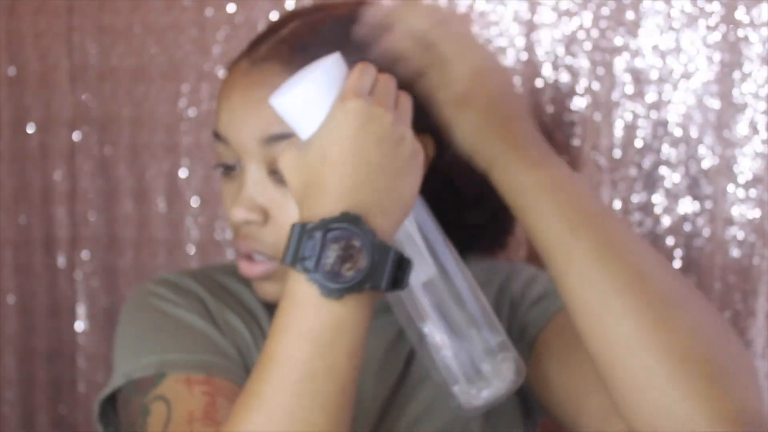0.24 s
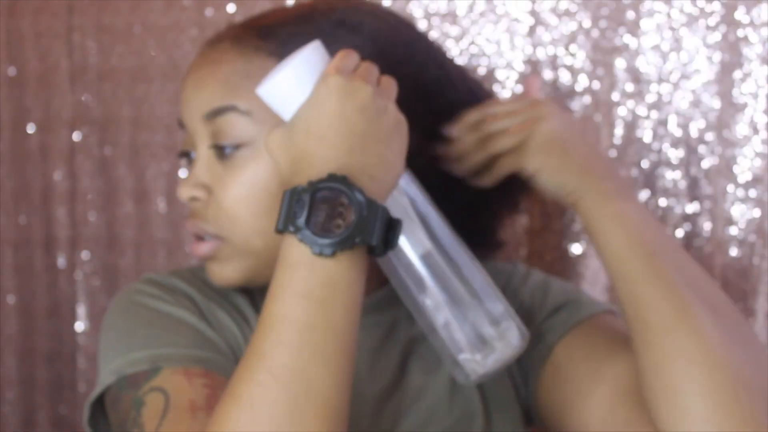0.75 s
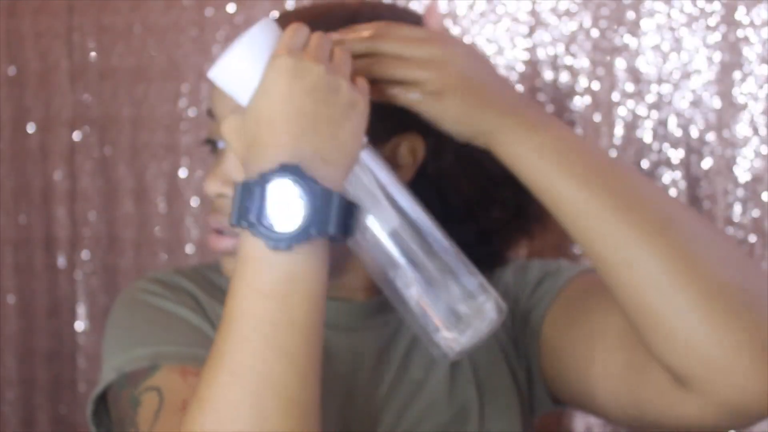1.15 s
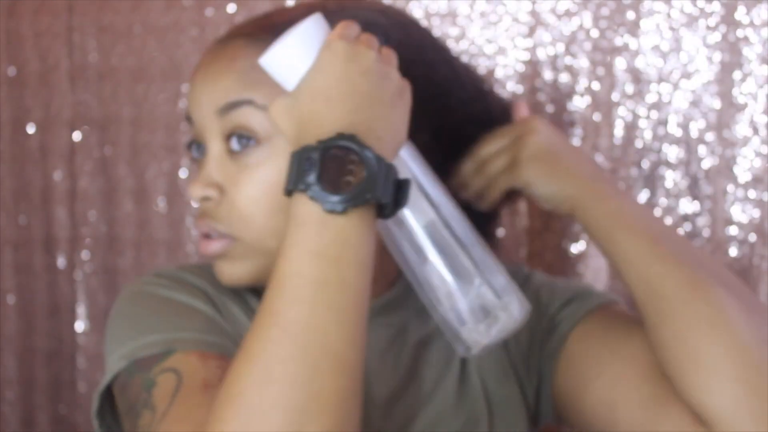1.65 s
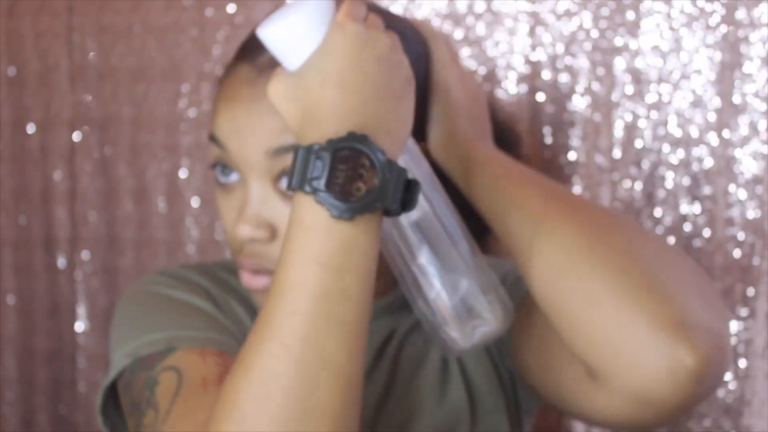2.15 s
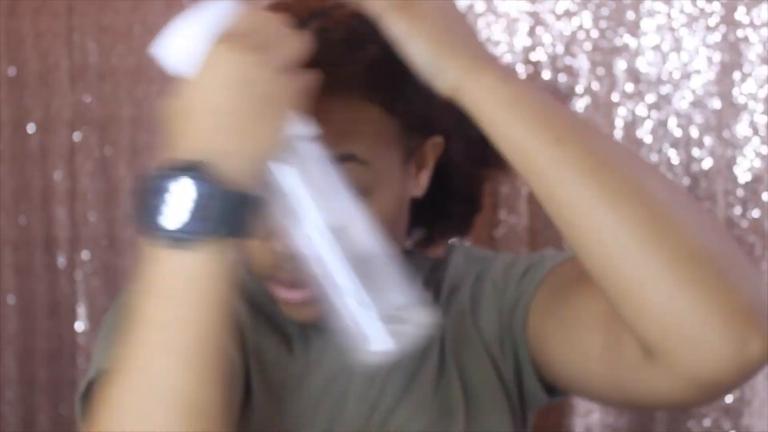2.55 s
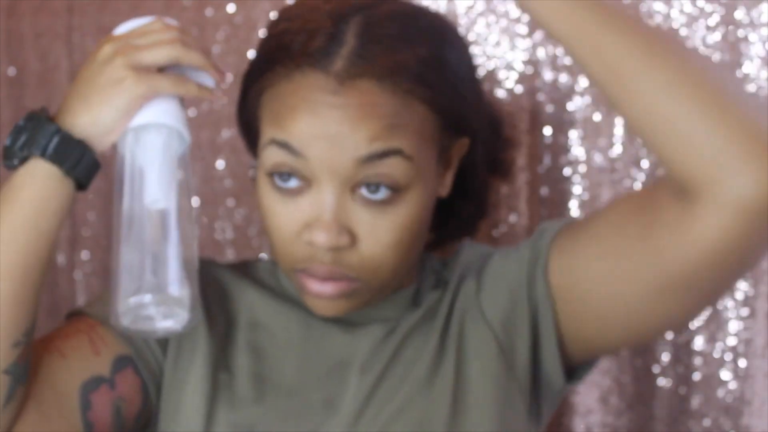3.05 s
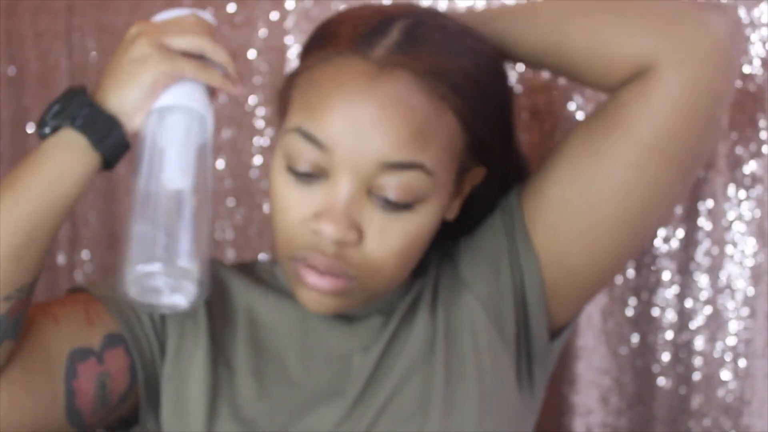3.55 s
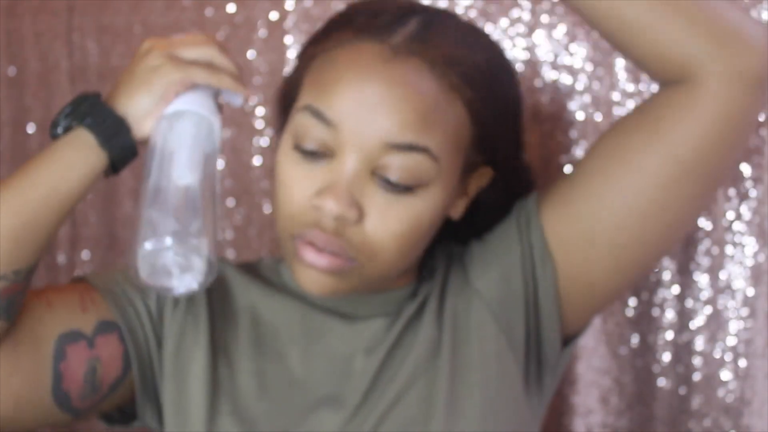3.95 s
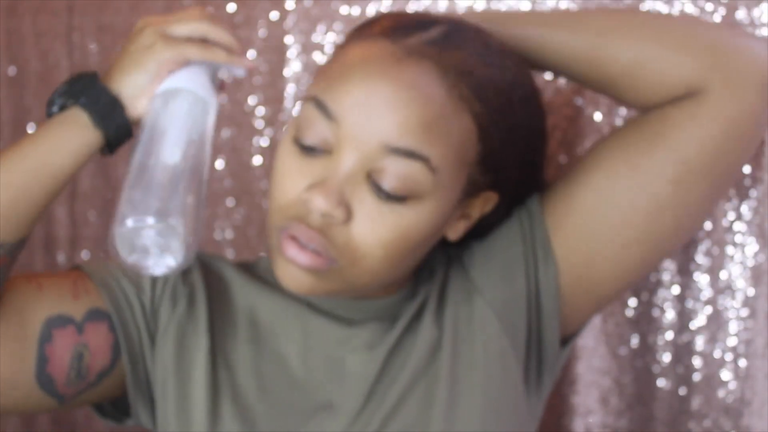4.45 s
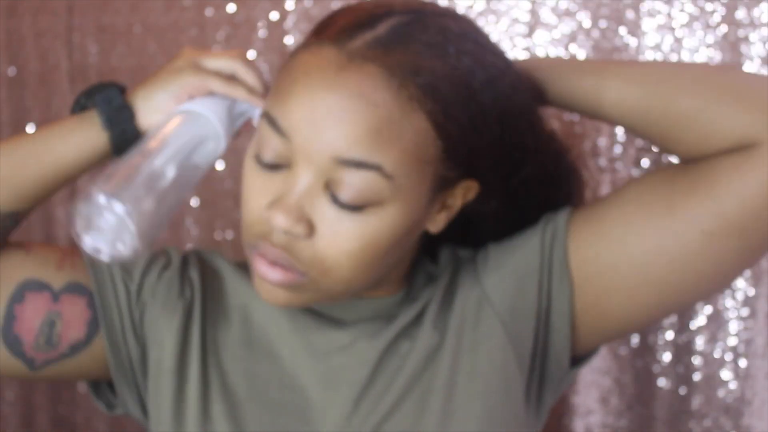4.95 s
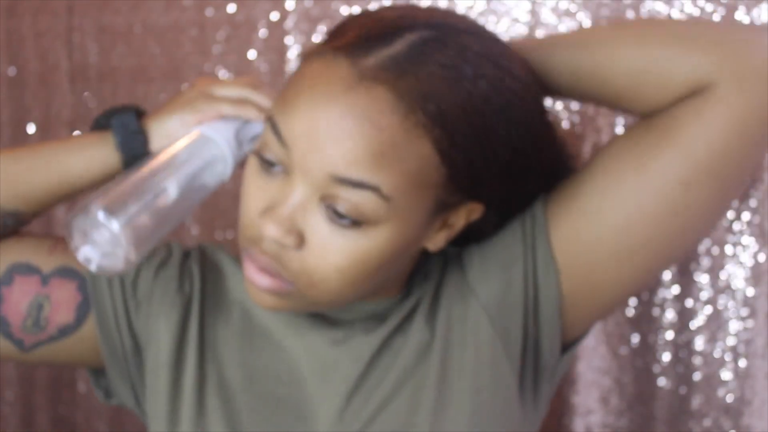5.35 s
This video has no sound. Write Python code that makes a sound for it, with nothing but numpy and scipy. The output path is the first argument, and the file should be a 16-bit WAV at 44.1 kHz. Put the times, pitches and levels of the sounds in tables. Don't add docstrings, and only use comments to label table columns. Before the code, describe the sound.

Close, uneven bursts of hissing water spray with clicking plastic trigger snaps in a small room, above a quiet steady hum.

```python
import sys
import numpy as np
from scipy import signal
from scipy.io import wavfile
from scipy.ndimage import uniform_filter1d

SR = 44100
rng = np.random.default_rng(int(sys.argv[2]) if len(sys.argv) > 2 else 0)


def inscribe(sig):
    pcm = np.round(np.clip(np.atleast_2d(sig).T, -1, 1) * 32767)
    wavfile.write(sys.argv[1], SR, pcm.astype(np.int16))


def elevation(decibels):
    levels = np.asarray(decibels, float)
    return 10 ** (levels / 20)


N = 247401
TIME = np.arange(N) / SR

# (frequency [Hz], level [dB per Hz])
JET_COLOUR = [(240, -61.5), (400, -16), (741, -10.5), (919, -5), (1330, -5.5), (1870, -7), (2390, 0.5),
              (2880, -5.5), (3200, -2), (6210, -3), (8860, -7), (12400, -23), (15900, -39)]


def evened(x):
    return x / np.sqrt(np.mean(x ** 2) + 1e-20)


def read(points, hz):
    f, value = np.transpose(points)
    return np.interp(np.log(hz + 1), np.log(f + 1), value)


def add(mix, s, sound):
    part = mix[round(s * SR):][:len(sound)]
    part += sound[:len(part)]


def resonate(x, hz, width, times):
    turn = np.exp(2j * np.pi * np.cumsum(hz * np.ones(len(x))) / SR)
    r = np.exp(-np.pi * width / SR)
    for _ in range(times):
        x = 2 * (turn * signal.lfilter([1 - r], [1, -r], x / turn + 1e-18)).real
    return x


def ring(modes, detune):
    t = np.arange(4000) / SR
    return sum(elevation(db - 60 * t / t60) * np.sin(2 * np.pi * hz * d * t)
               for (hz, db, t60), d in zip(modes, detune))


def colour(x, spectrum):
    hz = np.fft.rfftfreq(256, 1 / SR)
    log_gain = np.log(elevation(np.maximum(read(spectrum, hz), -100)))
    circle = np.concatenate([log_gain, log_gain[-2:0:-1]])
    causal = np.fft.ifft(np.exp(circle - 1j * signal.hilbert(circle).imag)).real
    return signal.fftconvolve(x, causal[:128])[:len(x)]


def drift(top_hz):
    hz, t = np.geomspace(top_hz / 12, top_hz, 16)[:, None], TIME[::256]
    waves = np.sin(2 * np.pi * (hz * t + rng.random(hz.shape))) / np.sqrt(hz)
    return np.interp(TIME, t, evened(waves.sum(0)))


def noise(spectrum, patchy_db, size, tilt_db=None):
    hop = size // 4
    frames, hz = N // hop + 5, np.fft.rfftfreq(size, 1 / SR)
    a, b, patches = rng.standard_normal((frames, len(hz), 3)).T
    patches = uniform_filter1d(uniform_filter1d(patches, size=5, axis=0), size=10, axis=1)
    slow_patches = uniform_filter1d(patches, size=60, axis=1)
    patches = evened(patches) + 1.5 * evened(slow_patches)
    field = elevation(read(spectrum, hz)[:, None] + patchy_db * patches)
    if tilt_db is not None:
        octaves = np.log2((hz[:, None] + 50) / 4500)
        leaning = field * elevation(octaves * np.interp(np.arange(frames) * hop, np.arange(N), tilt_db))
        field = leaning * np.sqrt((field ** 2).sum(0) / (leaning ** 2).sum(0))
    return evened(signal.istft((a + 1j * b) * field, nperseg=size, noverlap=size - hop)[1][:N])


def valve():
    # (valve opens [s], valve shuts [s], pressure [dB], nozzle tuning [factor],
    # bottle ring [dB])
    bursts = [(-.1, 0.355, -35, 0.94, -1), (0.481, 0.658, -35.5, 0.91, -1),
              (0.823, 1.082, -35.5, 0.96, -0.5), (1.314, 1.722, -35.5, 1.01, -1.5),
              (1.696, 2.226, -35.5, 1.02, -1), (2.265, 2.498, -35.5, 0.92, -1),
              (2.785, 3.056, -34.5, 1, -5.5), (3.564, 3.879, -35, 1.03, -2.5),
              (3.95, 4.181, -35.5, 1.05, -1), (4.526, 4.746, -35.5, 1.08, -0.5),
              (4.869, 5.042, -35.5, 1.07, -1.5), (5.566, 5.8, -37.5, 1.04, -2)]
    opens, shuts, full_db, tuned, rings_db = np.transpose(bursts)[..., None]
    build_s, stick_s = 0.019, 0.16
    rest_s = np.maximum(abs(opens - np.roll(shuts, 1)), .01)
    spurt = 0.57 * (1 - np.exp(-rest_s / stick_s))
    since, after = np.maximum(TIME - opens, 0), np.maximum(TIME - shuts, 0)
    sag_db = 4 * since
    bleed_db = 1.5 * (1 - np.exp(-after / 0.0061)) + 290 * after
    lost_db = sag_db + bleed_db
    flow = (since > 0) * (1 - (1 - spurt) * np.exp(-since / build_s))
    each_db = full_db - lost_db + 20 * np.log10(flow + 1e-9)
    newest, pressure_db = each_db.argmax(0), each_db.max(0)
    bled_db = np.minimum(lost_db[newest, np.arange(N)], 30)
    popping = np.exp(-since[newest, np.arange(N)] / build_s)
    ring_db = rings_db[newest, 0] + 0.063 * bled_db
    tuning = uniform_filter1d(tuned[newest, 0], size=800)
    return pressure_db, bled_db, popping, ring_db, tuning


def mist():
    # (frequency [Hz], width [Hz], level [dB])
    nozzle_rings = [(2225, 430, -5.5), (3092, 300, -2.5), (3550, 69, -7.5), (5320, 920, -2),
                    (6660, 580, -5)]
    # (frequency [Hz], width [Hz], level [dB])
    bottle_air = [(923, 60, -17), (835, 37, -28), (983, 130, -37)]
    # (time [s], lower nozzle ring [dB], upper nozzle ring [dB],
    # lower ring tuning [factor], brightness [dB per octave])
    facing = [(0, 3, -4, 1.13, 1), (.6, 0, -4, 1.04, 1.5), (1, 1.5, -1, 1.05, 1.5),
              (1.4, 4.5, 2.5, 1.07, 1.5), (1.8, 6.5, 0, 1.07, 2), (2.3, 0.5, -2.5, 1.17, 1.5),
              (2.9, -4, 0.5, 0.96, 2.5), (3.65, 3.5, 1.5, 0.94, 2), (3.85, -3, 4, 0.99, 1.5),
              (4.1, 0, 2.5, 0.98, 2.5), (4.65, 1.5, 0.5, .94, 2.5), (4.95, 2, 0, 1.03, 2.5),
              (5.6, -5, 6, 1, 2)]
    turn, lower_db, upper_db, lower_tuning, facing_db = np.transpose(facing)
    pressure_db, bled_db, popping, ring_db, tuning = valve()
    tilt_db = np.interp(TIME, turn, facing_db) - .12 * bled_db + 0.5 * popping
    droplets = evened(uniform_filter1d(rng.standard_normal(N), size=60))
    sputter = elevation(0.71 * droplets)
    jet = noise(JET_COLOUR, patchy_db=0.5, size=512, tilt_db=tilt_db) * sputter
    white = rng.standard_normal(N) * sputter
    tunings = [np.interp(TIME, turn, lower_tuning)] + [tuning] * (len(nozzle_rings) - 1)
    lower, *upper = (elevation(db) * evened(resonate(white, hz * k, width, times=2))
                     for (hz, width, db), k in zip(nozzle_rings, tunings))
    nozzle = elevation(np.interp(TIME, turn, lower_db)) * lower
    nozzle = nozzle + elevation(np.interp(TIME, turn, upper_db)) * sum(upper[:2]) + sum(upper[2:])
    bottle = sum(elevation(db) * evened(resonate(white, hz, width, times=2)) for hz, width, db in bottle_air)
    return elevation(pressure_db) * (evened(jet + elevation(-8.0) * nozzle) + elevation(ring_db) * bottle)


def trigger():
    # (time [s], peak [dB], hollow knock [dB], middle [dB], rattle length [s])
    snaps = [(.431, -26, -17, -16, 0.009), (0.791, -32, -7.5, -4, 0.015), (1.2516, -32, -7, -5.5, 0.024),
             (1.7084, -25, -12.5, -24, 0.0067), (2.208, -32, -8.5, -10, 0.0083),
             (2.728, -26, -11, -13, 0.0072), (3.483, -29, -16, -10, 0.0083),
             (3.921, -23.5, -20, -9, 0.0084), (4.444, -29.5, -25, -8, 0.0062),
             (4.8297, -25, -15.5, -10, 0.0079), (5.4936, -26.5, -18, -3.5, 0.0076)]
    # (frequency [Hz], level [dB])
    lever_colour = [(300, -67), (600, -55), (1100, -15), (1420, 6.5), (1750, -10), (2300, 11), (2750, -8.5),
                    (3200, 8), (4000, 4), (4600, 7.5), (6000, -52)]
    # (frequency [Hz], level [dB])
    scrape_colour = [(3500, -48), (4600, -6), (5700, 2), (6700, 4), (7600, -2.5), (8600, -3), (9800, -14),
                     (12200, -33.5), (13500, -55), (16000, -60)]
    # (frequency [Hz], level [dB])
    tick_colour = [(2000, -20), (5000, -8), (9000, -2), (11500, 6), (13000, 0), (14200, -18), (16500, -14)]
    # (frequency [Hz], level [dB], t60 [s])
    pump_parts = [(2340, -10, 0.01), (3130, -4.5, 0.011), (4180, -3.5, 0.0085), (5650, -8, 0.005),
                  (7100, 1.5, 0.0086), (8700, 0, 0.0088), (11900, -15, .004)]
    # (frequency [Hz], level [dB], t60 [s])
    wall = [(483, -8.5, 0.073), (533, -6, 0.075), (700, 4.5, 0.015)]
    # (frequency [Hz], level [dB], t60 [s])
    hollow_air = [(726, 3.5, 0.043), (829, 12, 0.051), (927, 8.5, 0.053)]
    out, hollow, t = np.zeros(N), np.zeros(N), np.arange(4000) / SR
    rise = 1 - np.exp(-t / .00015)
    puff = elevation(-24.0 - 140 * t) / (1 + np.exp((t - .042) / 0.0016))
    first = 0.75 * np.exp(-t / 0.0014)
    blow = signal.windows.hann(30)
    swell = (1 - np.exp(-t / .008)) ** 1.5
    for s, peak_db, knock_db, middle_db, length in snaps:
        rough, airy, gritty = rng.standard_normal((3, 4000))
        contacts = abs(gritty) > 1.9
        fade = rise * np.exp(-(t / (0.98 * length)) ** 1.4)
        scrape = (0.65 + contacts + first) * fade + 0.3 * puff
        detune = 1 + .02 * rng.standard_normal(13)
        struck = [(hz, db + 2.0 * luck, t60)
                  for (hz, db, t60), luck in zip(pump_parts, rng.standard_normal(7))]
        taps = uniform_filter1d(rough * contacts * fade, size=3)
        parts = [
            colour(rough * scrape, scrape_colour),
            colour(airy * scrape, lever_colour),
            signal.fftconvolve(taps, ring(struck, detune[6:]))[:4000],
            swell * signal.fftconvolve(blow, ring(wall, detune[:3]))[:4000],
            swell * signal.fftconvolve(blow, ring(hollow_air, detune[3:6]))[:4000],
            colour(airy * (puff + 0.088 * first * rise), JET_COLOUR),
            colour(gritty * rise * np.exp(-t / .002), tick_colour)]
        parts = [p / np.sqrt(uniform_filter1d(p ** 2, size=200).max()) for p in parts]
        bright, middle, clack, thud, knock, sucked, tick = parts
        tick_db = -20 + .8 * (peak_db + 24)
        snap = bright + elevation(middle_db) * middle + elevation(-6) * clack + elevation(-13) * sucked + elevation(tick_db) * tick
        add(out, s, elevation(peak_db) * snap)
        add(hollow, s, elevation(-47.5) * thud + elevation(peak_db + knock_db) * knock)
    return out, hollow


def creaks():
    # (time [s], level [dB], frequency [Hz], width [Hz], length [s])
    slips = [
        (3.4105, -44, 3350, 550, 0.019),
        (3.434, -45, 3350, 550, 0.024),
        (3.4115, -48, 5300, 2500, 0.004),
        (3.415, -57, 2050, 600, 0.062),
        (3.415, -58, 5000, 3000, 0.05),
        (3.451, -56, 8000, 1800, .004),
        (3.41, -61, 1000, 600, .07),
        (1.18, -56, 1050, 300, .06),
        (2.6, -60, 1900, 900, .12),
    ]
    out = np.zeros(N)
    for s, db, hz, width, length in slips:
        t = np.arange(round(length * SR)) / SR
        band = resonate(rng.standard_normal(len(t)), hz, width, times=3)
        fade = np.exp(-.8 * t / length) * np.minimum((length - t) / .003, 1)
        add(out, s, elevation(db) * evened(band) * fade)
    return out


def gurgle():
    # (time [s], level [dB], frequency [Hz])
    tube = [
        (3.6, -70, 453),
        (3.64, -54, 450),
        (3.71, -55.5, 449),
        (3.76, -61, 447),
    ]
    s, db, hz = np.transpose(tube)
    tone = np.sin(2 * np.pi * np.cumsum(np.interp(TIME, s, hz)) / SR)
    return np.sqrt(2) * elevation(np.interp(TIME, s, db, left=-140, right=-140)) * tone


def fan():
    # (time [s], low drone [dB], lowest multiple against it [dB])
    drone = [(0, -39, 2), (.18, -46, -6), (.32, -37.5, -20), (.6, -47.5, 0), (1.05, -44, -3),
             (1.3, -44.5, -1), (1.55, -44.5, 9.5), (1.7, -51, 0), (2.1, -46, 4), (2.35, -46, 1),
             (2.85, -49, 8), (3.1, -40, -7), (3.3, -40.5, -12), (3.55, -51, -5), (4.05, -38.5, -5),
             (4.55, -40, -7), (4.75, -47.5, 4), (5.61, -47, 3)]
    # (time [s], level [dB])
    casing_ring = [(0, -59), (1.5, -59), (3.1, -60.5), (3.6, -56.5), (4.1, -52.5), (4.6, -56), (4.9, -63),
                   (5.61, -54.5)]
    # (frequency [Hz], level [dB per Hz])
    rumble_colour = [(12, -41.5), (20, -36), (33, -14), (49, -1.5), (91, -4), (123, -2), (179, -8.5),
                     (242, -7.5), (307, -6), (371, -14.5), (400, -40), (520, -50), (880, -120)]
    low_orders = (15, 16, 17, 18, 19)
    mid_orders = (21, 24, 26, 27, 29, 30, 39, 42)
    top_orders = (45, 48, 49, 50, 51)
    low_levels = (2.5, -2.5, -1, 7.5, -11)
    mid_levels = (-55.5, -50.5, -60, -50.5, -61, -56.5, -74.5, -68.5)
    top_levels = (4.5, 2.5, -7.5, -5, -12)
    shaft_hz = 19.56 / 3
    casing_db = np.interp(TIME, *np.transpose(casing_ring))
    s, drone_db, lowest_db = np.transpose(drone)
    low_db = np.interp(TIME, s, drone_db) + 1.5 * drift(11)
    top_db = -47.5 - 0.59 * np.maximum(casing_db + 59.5, 0) + 0.13 * drift(9.2)
    turns = np.cumsum(shaft_hz * (1 + 0.0018 * drift(2.6))) / SR

    def orders(multiples, levels_db, waver_db, wander):
        total = np.zeros(N)
        for k, db in zip(multiples, levels_db):
            phase = 2 * np.pi * (k * turns + rng.random()) + wander * drift(2.5)
            total += elevation(db + waver_db * drift(4.6)) * np.sqrt(2) * np.sin(phase)
        return total

    leaning_db = [low_levels[0] + np.interp(TIME, s, lowest_db), *low_levels[1:]]
    low = elevation(low_db - 9) * orders(low_orders, leaning_db, waver_db=0.55, wander=1.12)
    middle = orders(mid_orders, mid_levels, waver_db=-0.25, wander=0.33)
    top = elevation(top_db) * evened(orders(top_orders, top_levels, waver_db=0.47, wander=0.43))
    casing = orders([36], [casing_db], waver_db=1.5, wander=.3)
    rumble = elevation(-52) * noise(rumble_colour, patchy_db=1, size=4096)
    return low + middle + top + casing + rumble


def still_air():
    # (frequency [Hz], level [dB per Hz])
    air_colour = [(210, -27), (350, -4.5), (450, -6.5), (600, -13), (780, -9), (1000, -12), (1700, -14.5),
                  (3200, -16), (6000, -20.5), (9000, -25.5), (12000, -33), (15000, -39), (16500, -60)]
    return elevation(-56.5) * noise(air_colour, patchy_db=0.74, size=1024)


def room(x):
    # (frequency [Hz], t60 [s])
    dying = [(300, 0.76), (1000, 0.93), (3000, 0.52), (8000, 0.4), (12000, 0.22), (15000, 0.13)]
    taps = np.zeros(SR // 2)
    at = np.arange(200, SR // 2 - 20, 20)
    taps[at + rng.integers(0, 20, at.shape)] = rng.choice([-1., 1.], at.shape)
    hz, t, z = signal.stft(taps, SR, nperseg=256)
    tail = signal.istft(z * elevation(-60 * t / read(dying, hz)[:, None]), SR, nperseg=256)[1]
    return signal.fftconvolve(x, tail / np.linalg.norm(tail))[:N]


def scene():
    spray = mist()
    snaps, knocks = trigger()
    snaps = snaps + creaks()
    wet = room(elevation(-10.5) * spray + elevation(-7.5) * snaps + elevation(-10.0) * knocks)
    mono = spray + snaps + knocks + wet + gurgle() + fan() + still_air()
    return np.array([mono, mono])


def top_cut(x):
    return signal.sosfilt(signal.butter(12, 16060, fs=SR, output="sos"), x)


def record(dry):
    edge = signal.firwin(255, 15200, window=("kaiser", 9), fs=SR)
    mix = signal.oaconvolve(dry, edge[None], "same")
    return top_cut(mix)


dry = scene()
out = record(dry)
inscribe(out)
```